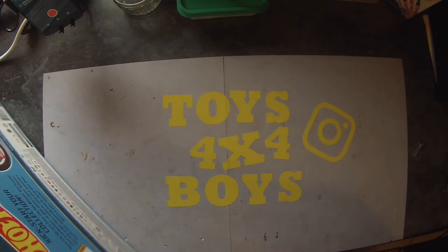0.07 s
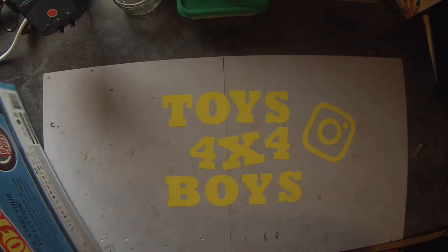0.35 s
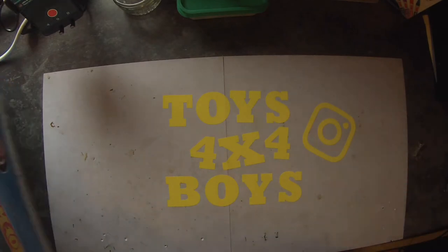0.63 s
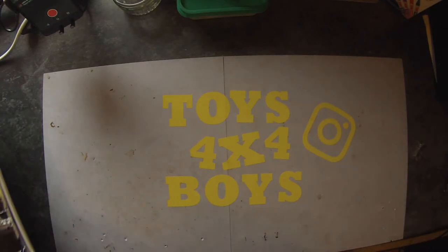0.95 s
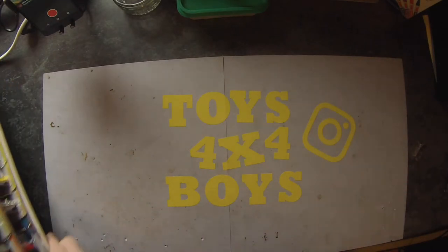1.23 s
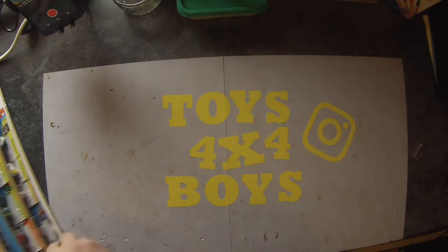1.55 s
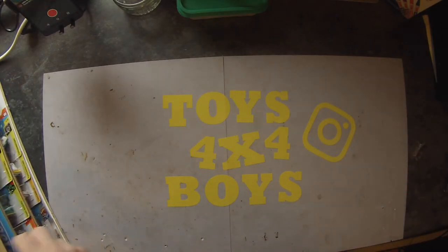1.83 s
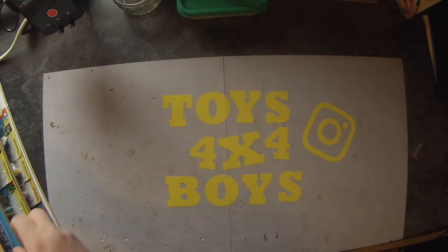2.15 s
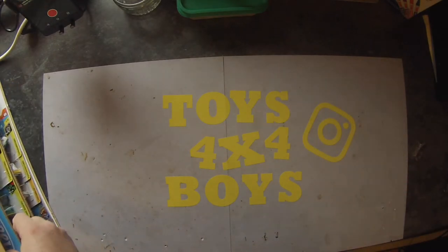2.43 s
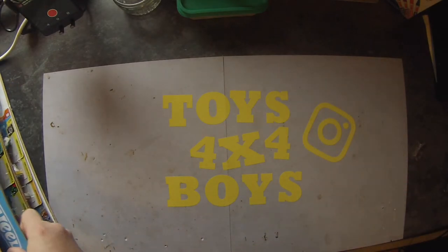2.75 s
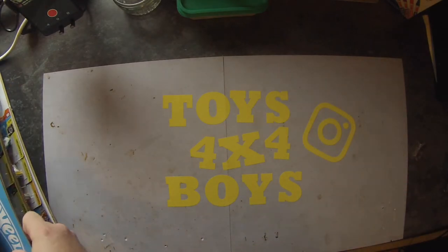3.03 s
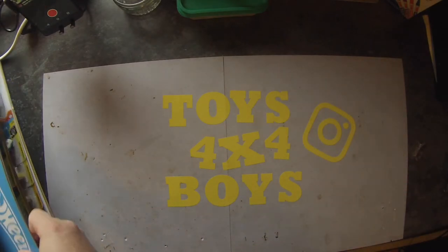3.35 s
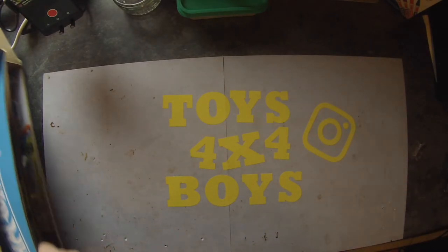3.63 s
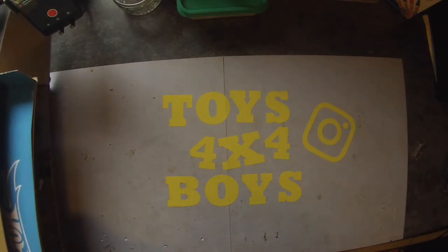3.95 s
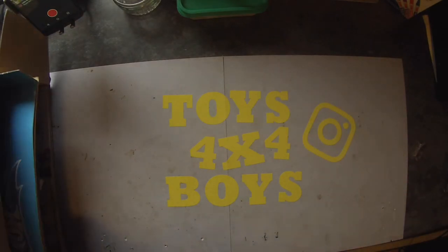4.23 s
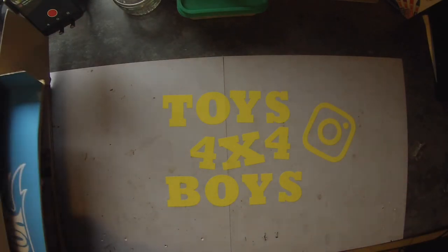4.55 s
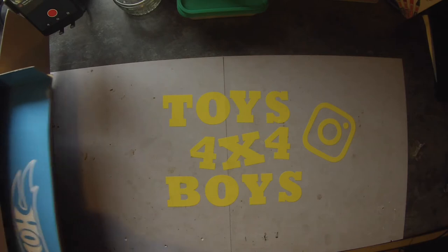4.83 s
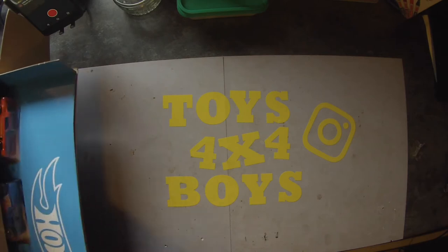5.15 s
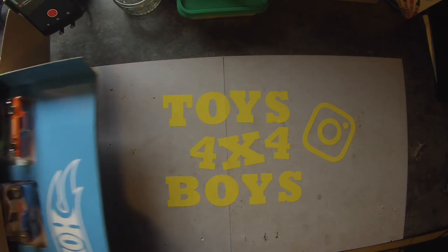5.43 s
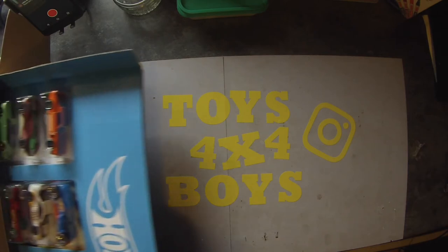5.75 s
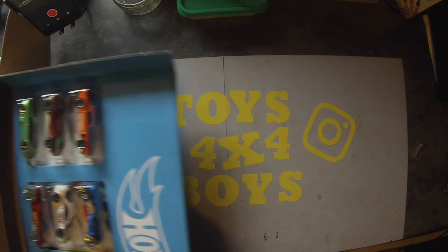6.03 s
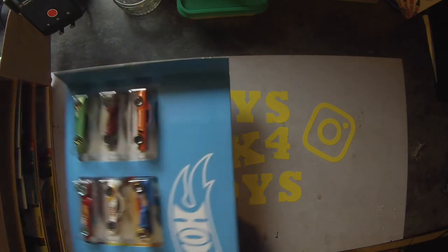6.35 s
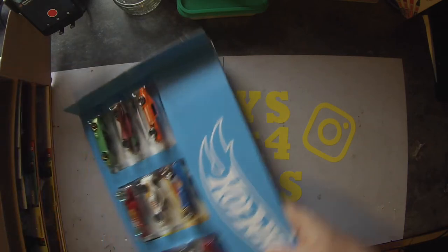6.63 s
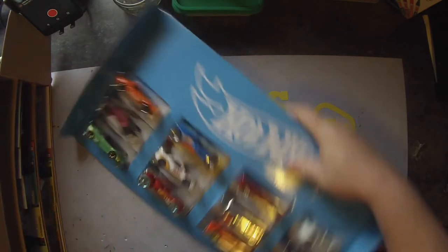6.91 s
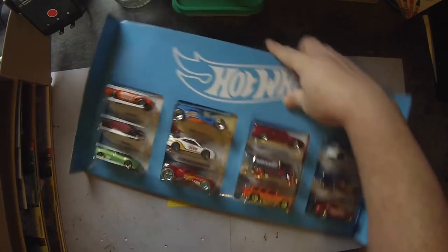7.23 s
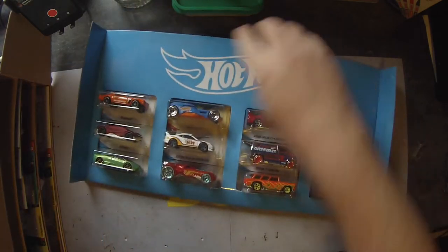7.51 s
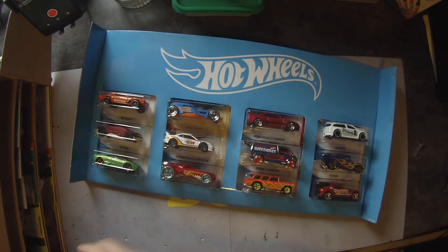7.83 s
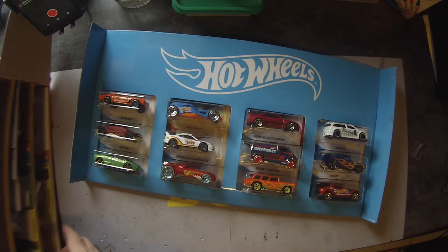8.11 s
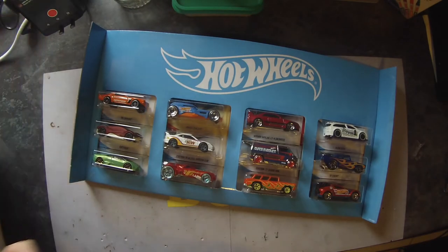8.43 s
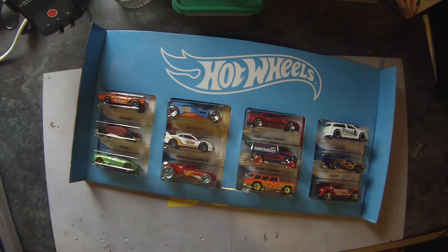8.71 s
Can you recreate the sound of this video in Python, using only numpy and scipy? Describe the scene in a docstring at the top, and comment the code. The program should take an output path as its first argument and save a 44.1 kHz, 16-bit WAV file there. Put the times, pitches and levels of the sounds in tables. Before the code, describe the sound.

Close to the microphone in a small, quiet room, card scrapes on card in fits and starts, mixed with flap knocks, soft bumps, small squeaks and ticking plastic packaging. A smoother slide over a tabletop leads into several plastic pops and a run of firmer knocks as a loaded tray settles. Last, the cardboard box is shoved away with squeaks, a knock and juddering drags. The walls add a short echo.

```python
"""A table in a small room, one microphone close to a cardboard display tray of carded toy cars.
The tray is worked out of its box, slid over the table and set down; the box is pushed aside.
Card rubs on card, and its edges stick and slip in squeaks, drags and judders. The loaded box sways,
struck flaps and panels ring, and the plastic blisters creak, tick and pop under the fingers.
The walls give a short echo over a faint hush."""
import sys
import numpy as np
from scipy import signal
from scipy.fft import rfft, irfft, next_fast_len
from scipy.io import wavfile
from scipy.ndimage import uniform_filter1d, map_coordinates

SR = 44100
rng = np.random.default_rng(int(sys.argv[2]) if len(sys.argv) > 2 else 0)


def digitize_waveform(pressure):
    """Quantize a signal to 16-bit integers and store it at the path in sys.argv[1].

    Rows of a 2-D input are taken as channels; values are limited to [-1, 1].
    """
    field = np.atleast_2d(pressure).T
    bounded = np.clip(field, -1, 1)
    quanta = np.round(bounded * 32767).astype(np.int16)
    wavfile.write(sys.argv[1], SR, quanta)


N = 395611
TOP_HZ = 15600


def amp(db):
    """Gain of a level in dB."""
    return 10 ** (np.asarray(db) / 20)


def unit(x):
    """x at rms 1."""
    return x / np.sqrt(np.mean(x ** 2) + 1e-20)


def along(points, hz):
    """(Hz, value) points read on a log axis."""
    freqs, values = np.transpose(points)
    return np.interp(np.log(hz + 1), np.log(freqs), values)


def peak(hz, centre, width):
    """A resonance's bell, 1 at its centre."""
    return 1 / (1 + (2 * (hz - centre) / width) ** 2)


def wobble(rate, n):
    """A smooth random curve, rate knots a second."""
    return map_coordinates(rng.standard_normal(int(n * rate / SR) + 4), [np.arange(n) * rate / SR])


def add(track, start, x):
    """Mix x into the track at start seconds."""
    i = max(round(start * SR), 0)
    track[i:i + len(x)] += x[:max(len(track) - i, 0)]


def colour(x, db_at, size=8192):
    """Causal filter whose gain in dB is a function of frequency."""
    cepstrum = irfft(np.log(amp(db_at(np.fft.rfftfreq(size, 1 / SR))) + 1e-6))
    cepstrum[1:size // 2] *= 2
    cepstrum[size // 2 + 1:] = 0
    impulse = irfft(np.exp(rfft(cepstrum)))[:size // 2]
    return signal.fftconvolve(x, impulse)[:len(x)]


# The box and table top, heard close. Each row: centre in Hz, width in Hz, gain in dB.
BOX_RESONANCES = [(187.7, 22, 5), (207, 12, -5), (268.5, 41, 4.5), (431, 45, 1.5), (667, 74, 2),
                  (820, 90, -0.5), (1110, 430, 0.5), (1545, 74, -2), (2140, 51, 1.5), (3600, 1300, 1),
                  (8800, 4200, -1)]
# The borders in Hz of the card's three registers: flexing panel, board, surface hiss.
REGISTER_EDGES_HZ = [90, 450, 1900, 15000]
def card(force, spectrum, register, rings=()):
    """The card's answer in one register (0 panel, 1 board, 2 hiss), with extra (Hz, Q, dB) rings."""
    low, high = REGISTER_EDGES_HZ[register:register + 2]

    def gain_db(hz):
        box = sum(db * peak(hz, centre, width) for centre, width, db in BOX_RESONANCES)
        skirts = -10 * np.log10(1 + (low / (hz + 1)) ** 8 + (hz / high) ** 8 * (register < 2))
        flap = sum(db * peak(hz, centre, centre / q) for centre, q, db in rings)
        return along(spectrum, hz) + box + skirts + flap
    return colour(force, gain_db)


# Hands pushing card over card, close to the microphone. Each row: start in seconds, length in seconds,
# board level in dB, swell over the push in dB, panel and hiss in dB relative to the board.
PUSHES = [(0.0, 0.34, -47, -2.5, -5.5, 0.5), (0.371, 0.21, -45, 0.5, 1.5, -2),
          (0.705, 0.13, -42, 1.5, 0.5, -1.5), (0.872, 0.28, -47.5, -8, -5.5, 0.5),
          (1.127, 0.27, -52.5, 12, 2, 1.5), (1.367, 0.24, -49, 3, 7, -7.5),
          (1.552, 0.17, -40, -19.5, -0.5, -9.5), (1.821, 0.33, -53, -3, 2.5, -1.5),
          (2.34, 0.29, -53.5, 7.5, 6, -2), (2.619, .16, -46, 4, 5, -2), (2.799, 0.3, -47, 5, -0.5, -4.5),
          (3.174, 0.15, -50.5, 4, 0.5, -4), (3.393, 0.43, -46.5, 1.5, 1.5, -3.5),
          (3.84, 0.6, -57, -8.5, 5.5, 0.5), (4.458, 0.26, -44, 6.5, 0.5, -4),
          (4.674, 0.4, -45, 0.5, -3.5, -1), (5.11, 0.14, -53.5, -6, -1, -2),
          (5.273, 0.68, -45.5, -1.5, -3, 1), (6.013, 0.044, -44, -1.5, 4, -8),
          (6.347, 0.17, -52.5, -10, -16, -5), (6.46, 0.3, -43, -5.5, -16, -8),
          (6.752, 0.13, -37.5, -2.5, -12, -5), (6.948, 0.18, -40.5, -4.5, -9.5, -7.5),
          (7.105, 0.13, -47.5, 5.5, -11, -3), (7.255, 0.023, -38.5, 0.5, -12, -1),
          (7.318, 0.084, -41.5, 9, -9.5, -6), (7.807, 0.28, -47.5, 2.5, -1, -4),
          (8.14, 0.21, -48.5, -1, 5, -1), (8.394, 0.23, -46, -14, 1, -5), (8.637, 0.32, -38.5, 6, -2, -9.5)]
def pushing(attack_s=0.02, release_db_per_s=(168, 144, 172), hold_db=(-62.5, -62.5, -63.5)):
    """Gains of panel, board and hiss: each push takes hold, swells or eases, and dies to a light hold."""
    t = np.arange(0, N, SR // 500) / SR
    power = amp(hold_db)[:, None] ** 2 * np.ones(len(t))
    for start, length, db, swell_db, panel_db, hiss_db in PUSHES:
        age = t - start
        attack = np.clip(age / attack_s, 0, 1)
        shape_db = swell_db * (np.clip(age / length, 0, 1) - .5)
        shape_db = shape_db - np.outer(release_db_per_s, np.maximum(age - length, 0))
        power += (attack * amp(db + shape_db + [[panel_db], [0], [hiss_db]])) ** 2
    return [np.interp(np.arange(N) / SR, t, np.sqrt(p)) for p in power]


def travelling_friction(depth_db):
    """Noise of a moving contact, which brings out different resonances from moment to moment."""
    spectra = signal.stft(rng.standard_normal(N), nperseg=512)[2]
    patches = uniform_filter1d(rng.standard_normal(spectra.shape), size=4, axis=0)
    patches = uniform_filter1d(patches, size=8, axis=1)
    return signal.istft(spectra * amp(depth_db * unit(patches)), nperseg=512)[1][:N]


def fibres(per_second, spread_db):
    """Fibres catch in tiny random snags of uneven size."""
    snags = rng.random(N) < per_second / SR
    size = np.minimum(rng.exponential(size=N), 4)
    sign = rng.choice([-1, 1], N)
    return unit(snags * sign * amp(spread_db * size))


# Sliding card, and the table shaking under the box. Each row: frequency in Hz, gain in dB.
SLIDE_SPECTRUM = [(70, -7), (177, 2), (212, -5.5), (248, -3), (348, -2.5), (686, -0.5), (920, 1),
                  (1480, -8.5), (2220, -15.5), (7520, -27), (15500, -40.5)]
RUMBLE_SPECTRUM = [(15, 4), (40, -3), (75, -3.5), (130, -8.5), (400, -57)]
def rubbing(gains, snag_db=-2, uneven_db=1.93, rumble_db=-10, trim_db=-1.75):
    """Friction and snags drive the card under a wavering hand; on the smooth table the hiss evens out."""
    on_table = tray_on_table()
    force = travelling_friction(depth_db=3) + amp(snag_db) * fibres(per_second=500, spread_db=1)
    force *= amp(uneven_db * (1 - on_table / 2) * wobble(45, N))
    panel, board, hiss = [unit(card(force, SLIDE_SPECTRUM, register)) for register in range(3)]
    hiss = (1 - on_table) * hiss + on_table * tray_gliding(uneven_db / 2)
    rumble = unit(colour(rng.standard_normal(N), lambda hz: along(RUMBLE_SPECTRUM, hz)))
    rub = sum(gain * part for gain, part in zip(gains, [panel, board, hiss]))
    return amp(trim_db) * rub + amp(rumble_db) * gains[0] * rumble


def crinkling(rub_gain, count=220, centre_hz=2100, spread=0.448, cycles=7, size_db=4, level_db=1):
    """The cars' blisters creak and tap at random, louder as the card around them is rubbed harder."""
    out, t = np.zeros(N), np.arange(SR // 25) / SR
    for when, pitch, size in rng.random((count, 3)):
        hz = centre_hz * np.exp(spread * np.log(pitch / (1 - pitch)) / 2)
        ring = np.sin(2 * np.pi * hz * t) * np.exp(-hz * t / cycles)
        gain = rub_gain[int(when * N)] * amp(level_db - size_db * np.log(size + 0.14))
        add(out, when * N / SR, gain * ring)
    return out


# Card edges squeaking. Each row: start in seconds, length in seconds, first and last pitch in Hz,
# level in dB, step per overtone in dB, waver as a share of the pitch.
SQUEAKS = [(0.053, 0.14, 1736, 1616, -47, -27, 0.094), (0.999, 0.08, 2950, 3450, -45, -11, 0.075),
           (2.919, 0.033, 1560, 1456, -37, -30, 0.16), (4.023, 0.038, 703, 623, -37, -7, 0.013),
           (6.729, 0.066, 3270, 2060, -43.5, -27, 0.12), (7.876, 0.072, 620, 542, -40, -3, 0.068),
           (8.005, 0.085, 666, 544, -33, -4.5, 0.063), (8.438, 0.023, 4840, 4160, -37.5, -31, 0.095)]
def squeaking(flutter_db=2.5, ring_hz=1180, ring_width_hz=300, ring_db=8):
    """Quick, even slips make a rough gliding tone; the flap favours the overtone near its own ring."""
    out = np.zeros(N)
    for start, length, first_hz, last_hz, db, overtone_db, waver in SQUEAKS:
        n = int(length * SR)
        pitch = np.linspace(first_hz, last_hz, n) * (1 + waver * wobble(first_hz / 3, n))
        phase = 2 * np.pi * np.cumsum(pitch) / SR
        tone = np.zeros(n)
        for k in range(1, 7):
            harmonic_db = overtone_db * (k - 1) + ring_db * peak(k * pitch, ring_hz, ring_width_hz)
            tone += amp(harmonic_db) * np.sin(k * phase) * (k * pitch < TOP_HZ)
        tone *= amp(flutter_db * wobble(427, n))
        add(out, start, amp(db) * unit(tone) * signal.windows.tukey(n, .7))
    return out


# Soft bumps of the whole box. Each row: start in seconds, level in dB before the trim, pitch in Hz.
BUMPS = [(0.13, -35.5, 70), (0.16, -34.5, 80), (0.385, -33, 141.5), (0.722, -38, 44), (1.379, -31, 70.6),
         (1.425, -35, 84), (1.573, -34, 39.2), (1.954, -34.5, 159), (2.05, -33, 109), (3.115, -36.5, 138),
         (3.622, -29.5, 192), (3.777, -32, 183), (4.086, -38, 116), (7.984, -34.5, 124), (8.02, -35, 105),
         (8.742, -40, 52), (8.789, -33, 43.5), (8.885, -28, 180)]
def bumping(t60=0.097, rise_s=0.0013, trim_db=6.5, panel_ratio=1.576, panel_db=-7):
    """The loaded box sways for a few cycles after a soft push, and a stiffer panel with it."""
    out, t = np.zeros(N), np.arange(SR // 3) / SR
    for start, db, hz in BUMPS:
        sway = np.sin(2 * np.pi * hz * t) + amp(panel_db) * np.sin(2 * np.pi * panel_ratio * hz * t)
        envelope = amp(db + trim_db - 60 * t / t60) * (1 - np.exp(-t / rise_s))
        add(out, start, envelope * sway)
    return out


# Struck card. Each row: frequency in Hz, gain in dB.
KNOCK_SPECTRUM = [(70, 5), (300, 5.5), (800, 1.5), (1400, 4), (2300, 1.5), (3600, -2.5), (6000, -12.5),
                  (9000, -28), (15500, -46)]
# The clack of any stiff edge. Each row: centre in Hz, Q, gain in dB.
EDGE_RINGS = [(2250, 19, 4), (3080, 3.2, -0.5)]
# Flaps and edges striking near the microphone. Each row: start in seconds, level in dB before the trims,
# hardness as relative hiss in dB, the flap's ring in Hz.
KNOCKS = [(0.326, -30.5, 2.5, 970), (0.362, -29, -3, 970), (0.738, -21, -23, 754), (1.374, -20, -15, 423),
          (1.396, -34, 6, 1640), (1.563, -26, -15, 600), (1.956, -45, -33, 303), (2.045, -37.5, -37, 376),
          (2.344, -34, -18, 467), (2.41, -38, -15, 300), (2.715, -26.5, -14, 420), (2.836, -33.5, -5, 1500),
          (2.918, -24, -16, 860), (3.117, -30, -35, 280), (3.189, -31.5, -11, 1820),
          (3.286, -30.5, -10, 950), (3.777, -26, -12, 274), (4.028, -24, -9.5, 865),
          (4.088, -20.5, -24.5, 810), (4.569, -25.5, -4.5, 282), (4.82, -30.5, -25, 319),
          (4.908, -31.5, -14, 292), (5.046, -28.5, -8, 920), (5.115, -21, -5, 1010),
          (5.265, -23.5, -11.5, 1010), (5.288, -27.5, -16, 1110), (5.91, -29, -14, 1040),
          (5.974, -30.5, -14, 1170), (6.019, -33.5, -9, 1080), (6.171, -44, -8, 865),
          (6.249, -33, -7, 1070), (6.339, -32, -9, 1020), (6.476, -27.5, 0, 560),
          (6.488, -21.5, -2.5, 1040), (6.635, -31, -3.5, 815), (6.809, -23.5, -9, 1140),
          (6.886, -22, -9.5, 1680), (6.92, -27.5, -2, 1400), (6.986, -14.5, -22, 1110),
          (7.045, -19.5, -19, 990), (7.851, -54, 18.5, 397), (8.424, -17, -18, 490)]
def knocking(chatter_db=-14, crush_s=0.002215, t60=(.11, .07, .045), trim_db=(-11, -14, -13),
             ring_q=4.1, ring_db=11, soft_hz=1900, firm_db=-10, linger=0.11):
    """The edge crushes, pushes once and chatters to rest; the flap rings and the panels last longest."""
    out, t = np.zeros(N), np.arange(SR // 7) / SR
    push = np.arange(len(t)) == round(crush_s * SR)
    for start, db, hiss_db, ring_hz in KNOCKS:
        panel_db = -12 * np.log2(ring_hz / 280)  # a smaller flap rings higher and moves the panels less
        chatter = amp(chatter_db) * rng.standard_normal(len(t)) * np.minimum(t / crush_s, 1) ** 2
        dulling = (soft_hz, 1.5, min(hiss_db - firm_db, 0))  # a soft contact misses the upper modes
        stretch = amp(-linger * hiss_db)  # and stays in touch longer
        rings = [(ring_hz, ring_q, ring_db), *EDGE_RINGS, dulling]
        for register, part_db in enumerate([panel_db, 0, hiss_db]):
            force = push + chatter * amp(-60 * t / (stretch * t60[register]))
            knock = card(force, KNOCK_SPECTRUM, register, rings)
            knock /= np.std(knock[:SR * 3 // 100])
            add(out, start, amp(db + part_db + trim_db[register]) * knock)
    return out


def crumbling(jerks, decay_s):
    """The burst of friction noise that dies away after each jerk."""
    envelope = signal.lfilter([1], [1, -np.exp(-1 / (decay_s * SR))], jerks)
    return envelope * rng.standard_normal(len(jerks))


# Card catching on card, in drags and judders. Each row: frequency in Hz, gain in dB.
CATCH_SPECTRUM = [(70, -4), (173, -8), (207, -7), (284, -2.5), (364, -4), (478, 1), (1130, -5),
                  (1580, -10.5), (5010, -18.5), (15500, -33)]
# An edge dragging. Each row: start, length and time to the crest in seconds, slips a second,
# board level in dB, panel and hiss in dB relative to the board, ring and rasp in Hz.
DRAGS = [(0.479, 0.1, 0.08, 164, -37, -5, -6, 956, 3920),
         (0.74, 0.11, 0.0044, 190, -38.5, -7, -12, 745, 8800),
         (0.75, 0.034, .006, 470, -49, -6, 4, 760, 13500),
         (1.391, 0.089, 0.013, 118, -38, -2, -22, 640, 2360),
         (1.56, 0.049, 0.021, 180, -38, -1, -5, 900, 2060),
         (1.598, 0.11, 0.021, 190, -40, -10, -7.5, 693, 2080),
         (3.616, 0.063, 0.006, 190, -37, 1, -26, 680, 910),
         (6.808, 0.043, 0.0033, 230, -35.5, -8.5, -4.5, 1140, 5140),
         (6.975, 0.069, 0.013, 280, -28, -15, -33, 704, 1340),
         (7.036, 0.07, 0.0074, 245, -31, -12.5, -30, 754, 1250),
         (8.013, 0.072, 0.004, 170, -38, 2, -12.5, 1170, 2920),
         (8.437, 0.032, 0.014, 470, -33, -5, -4, 570, 4800),
         (8.785, 0.081, 0.027, 196, -41.5, 6, -4.5, 500, 2170),
         (8.882, 0.07, 0.014, 210, -34.5, -4.5, -7, 516, 5080)]
def dragging(jitter=.12, size_db=5, crumble_s=0.0072, ring_q=6, ring_db=9, rasp_q=1.2, rasp_db=8,
             start_db=-6, end_db=-11):
    """Stick and slip: an uneven train of jerks, each followed by a short crumble of friction."""
    out = np.zeros(N)
    for start, length, crest, rate, db, panel_db, hiss_db, ring_hz, rasp_hz in DRAGS:
        n = int(length * SR)
        timing, sizes = rng.standard_normal((64, 2)).T
        gaps = np.exp(jitter * timing[1:])
        at = (np.r_[0, np.cumsum(gaps)] * SR / rate).astype(int)
        jerks = np.zeros(n)
        jerks[at[at < n]] = amp(size_db * np.tanh(sizes[at < n]))  # the grip limits a jerk's size
        pressure_db = np.interp(np.arange(n) / SR, [0, crest, length], [start_db, 0, end_db])
        grit = amp(-21 - 1.22 * hiss_db) * crumbling(jerks, crumble_s)  # a duller drag crumbles more
        force = np.pad(amp(pressure_db) * (jerks + grit), (0, SR // 20))
        rings = [(ring_hz, ring_q, ring_db), (rasp_hz, rasp_q, rasp_db)]
        for register, part_db in enumerate([panel_db, 0, hiss_db]):
            drag = card(force, CATCH_SPECTRUM, register, rings)
            add(out, start, amp(db + part_db) * drag / np.std(drag[:n]))
    return out


# A tick, bright at this distance. Each row: frequency in Hz, gain in dB.
TICK_SPECTRUM = [(500, -10.5), (2000, -5), (5000, -11), (7800, -6), (8900, -4.5), (10500, -10.5),
                 (16000, -5.5)]
# The packaging ticking. Each row: start in seconds, peak in dB before the trim, treble cutoff in Hz.
TICKS = [(0.4818, -16.5, 15000), (0.505, -12, 8950), (0.5184, -18, 15000), (0.5247, -16, 15000),
         (0.533, -12, 15000), (0.55, -11, 15000), (0.555, -16, 15000), (0.5701, -12, 15000),
         (0.679, -9.5, 16000), (0.7046, -13, 16000), (0.719, -15.5, 15000), (1.399, -21, 7000),
         (1.5793, -12.5, 11000), (2.8157, -23, 3000), (2.8605, -20, 3500), (2.977, -22.5, 6500),
         (3.0393, -24, 3000), (3.189, -22.5, 7900), (3.2688, -30, 3000), (3.3228, -26, 3780),
         (3.535, -29, 9000), (3.831, -28, 7000), (4.029, -26, 7700), (4.073, -26, 8000),
         (4.2425, -26, 5000), (4.374, -30, 6000), (4.497, -18, 3450), (4.5715, -16.5, 12000)]
def ticking(t60=0.016, buzz_db=-10, trim_db=-10):
    """The packaging gives tiny dry snaps, gone in a few milliseconds."""
    out, t = np.zeros(N), np.arange(SR // 40) / SR
    for start, db, cutoff_hz in TICKS:
        snap = (t == 0) + amp(buzz_db - 60 * t / t60) * rng.standard_normal(len(t))
        tick = colour(snap, lambda hz: along(TICK_SPECTRUM, hz) - 10 * np.log10(1 + (hz / cutoff_hz) ** 6))
        add(out, start, amp(db + trim_db) * tick / np.abs(tick).max())
    return out


# Hollow notes from the panels. Each row: start in seconds, peak in dB, pitch in Hz, t60 in seconds.
THOCKS = [(1.3755, -16, 337, 0.056), (2.716, -26.5, 237, 0.099), (6.809, -20.5, 438, 0.063),
          (6.887, -23.5, 698, 0.03), (8.4258, -13, 520, 0.0089)]
def thocking(rise_s=0.00065):
    """A stiff panel, struck squarely, swings for a few clean cycles and stops."""
    out, t = np.zeros(N), np.arange(SR // 8) / SR
    for start, db, hz, t60 in THOCKS:
        note = np.sin(2 * np.pi * hz * t) * amp(-60 * t / t60) * (1 - np.exp(-t / rise_s))
        add(out, start, amp(db) * note / np.abs(note).max())
    return out


# An edge juddering. Each row: start in seconds, length in seconds, first and last slips a second,
# board level in dB, hiss in dB relative to the board, ring and rasp in Hz.
JUDDERS = [(2.872, 0.032, 140, 112, -44.5, -7, 1510, 3280), (8.148, 0.094, 62, 88, -46, -23, 1120, 3300),
           (8.464, 0.034, 200, 95, -35.5, -6, 600, 6000), (8.6398, 0.083, 62, 160, -37.5, -7.5, 486, 5360)]
def juddering(jitter=0.03, size_db=2.5, grit_db=-4, slip_s=0.0018, panel_db=-4,
              ring_q=2.3, ring_db=6, rasp_q=2.8, rasp_db=12, worn_hz=13000, worn_db=-7):
    """An edge lets go in clean slips that steadily quicken or slow; each is one short bright rasp."""
    out = np.zeros(N)
    worn = (worn_hz, 1, worn_db)  # a worn edge lacks the highest treble
    for start, length, first_rate, last_rate, db, hiss_db, ring_hz, rasp_hz in JUDDERS:
        n = int(length * SR)
        timing, sizes = rng.standard_normal((32, 2)).T
        slips_so_far = np.cumsum(np.linspace(first_rate, last_rate, n)) / SR
        at = np.searchsorted(slips_so_far, np.arange(32) + jitter * timing)
        jerks = np.zeros(n + SR // 20)
        jerks[at[at < n]] = amp(size_db * sizes[at < n])
        force = jerks + amp(grit_db) * crumbling(jerks, slip_s)
        rings = [(ring_hz, ring_q, ring_db), (rasp_hz, rasp_q, rasp_db), worn]
        for register, part_db in enumerate([panel_db, 0, hiss_db]):
            judder = card(force, CATCH_SPECTRUM, register, rings)
            add(out, start, amp(db + part_db) * judder / np.std(judder[:n]))
    return out


def tray_on_table(start_s=5.27, end_s=6.1):
    """1 while the tray slides on the bare table, fading quickly to 0 on either side."""
    t = np.arange(N) / SR
    return uniform_filter1d(1. * ((t > start_s) & (t < end_s)), size=SR // 50)


# The tray's floor singing on the bare table. Each row: centre in Hz, Q, gain in dB.
TRAY_RINGS = [(2280, 8.7, 8.5), (3000, 5, 4), (7900, 2.8, 4), (13500, 2.3, 3)]
def tray_gliding(uneven_db):
    """The smooth table draws an even hiss from the tray's floor."""
    force = travelling_friction(depth_db=1.6) * amp(uneven_db * wobble(18, N))
    return unit(card(force, SLIDE_SPECTRUM, register=2, rings=TRAY_RINGS))


# A plastic blister's modes. Each row: multiple of the shell pitch, level in dB, t60 in seconds.
SHELL_MODES = [(0.87, -1, 0.028), (1, 1, 0.02), (1.09, -1, 0.015), (1.26, -6.5, 0.024), (1.9, -15.5, 0.029)]
# Blisters popping under the fingers, close up. Each row: start in seconds, peak in dB,
# shell pitch and hollow pitch in Hz, hollow note in dB relative to the shell.
POPS = [(6.4601, -18.5, 2420, 613, -19), (6.4817, -16, 2516, 804, -4), (6.5385, -26, 3000, 800, -12),
        (6.578, -22.5, 2310, 780, -15), (6.7014, -16.5, 3050, 840, 2)]
def popping(hollow_t60=0.043, buckle_db=-17, buckle_t60=0.024):
    """A thin blister buckles: its shell clacks and the air inside gives a short hollow note."""
    out, t = np.zeros(N), np.arange(SR // 12) / SR
    for start, db, shell_hz, hollow_hz, hollow_db in POPS:
        force = (t == 0) + amp(buckle_db - 60 * t / buckle_t60) * rng.standard_normal(len(t))
        modes = sum(amp(mode_db - 60 * t / t60) * np.sin(2 * np.pi * shell_hz * ratio * t)
                    for ratio, mode_db, t60 in SHELL_MODES)
        clack = signal.fftconvolve(force, modes)[:len(t)]
        hollow = amp(-60 * t / hollow_t60) * np.sin(2 * np.pi * hollow_hz * t)
        pop = unit(clack) + amp(hollow_db) * unit(hollow)
        add(out, start, amp(db) * pop / np.abs(pop).max())
    return out


# The small room around the table. Each row: frequency in Hz, t60 in seconds.
ROOM_DECAY = [(150, 0.56), (1000, 0.36), (4000, 0.47), (12000, 0.25)]
def room_echo(sound):
    """The walls' short answer, duller as it dies."""
    hz, t, spectra = signal.stft(rng.standard_normal(SR // 2), SR, nperseg=256)
    decay = amp(-60 * t / along(ROOM_DECAY, hz)[:, None])
    tail = signal.istft(spectra * decay, SR, nperseg=256)[1]
    delayed_tail = np.pad(tail / np.linalg.norm(tail), (SR // 150, 0))
    return signal.fftconvolve(sound, delayed_tail)[:N]


# Room tone at the microphone. Each row: frequency in Hz, gain in dB.
HUSH_SPECTRUM = [(25, -5), (70, 7.5), (200, -5), (600, -12), (1500, -25), (4000, -28), (15500, -30)]
def scene(echo_db=-12, hush_db=-63):
    """At the one microphone: the close handling, its echo and the room's faint hush."""
    gains = pushing()
    friction = rubbing(gains) + crinkling(gains[2] * (1 - tray_on_table()))
    slips = dragging() + juddering() + squeaking()
    impacts = knocking() + thocking() + popping() + ticking() + bumping()
    handling = friction + slips + impacts
    hush = unit(colour(rng.standard_normal(N), lambda hz: along(HUSH_SPECTRUM, hz)))
    return (handling + amp(echo_db) * room_echo(handling) + amp(hush_db) * hush)[None]


def record(dry):
    """The camera's microphone channel passes nothing above TOP_HZ."""
    size = next_fast_len(N + SR // 2)
    passband = np.fft.rfftfreq(size, 1 / SR) < TOP_HZ
    return irfft(rfft(dry, size) * passband, size)[:, :N]


dry = scene()
out = record(dry)
digitize_waveform(out)
```